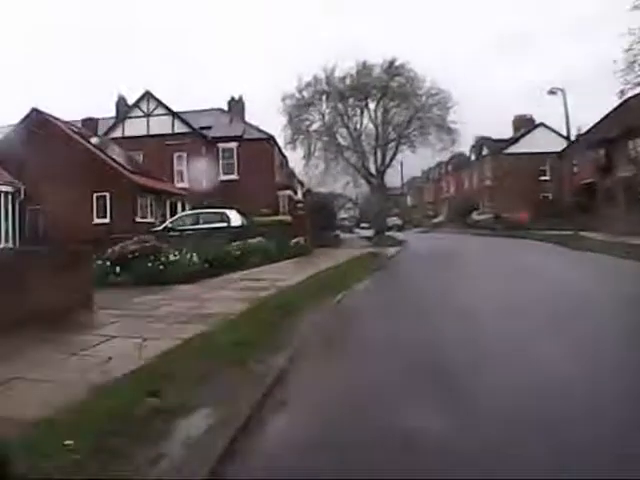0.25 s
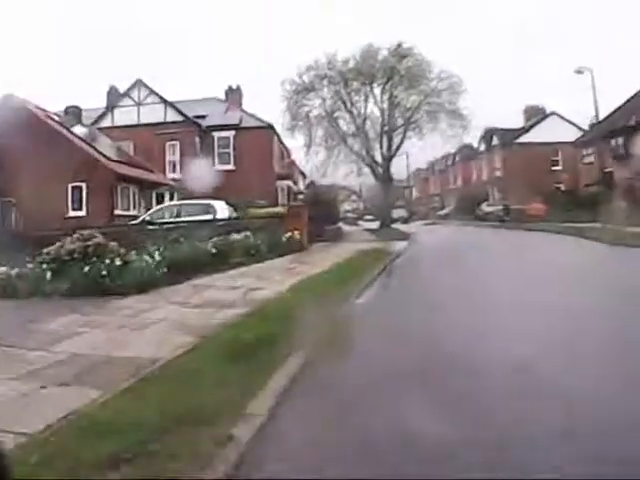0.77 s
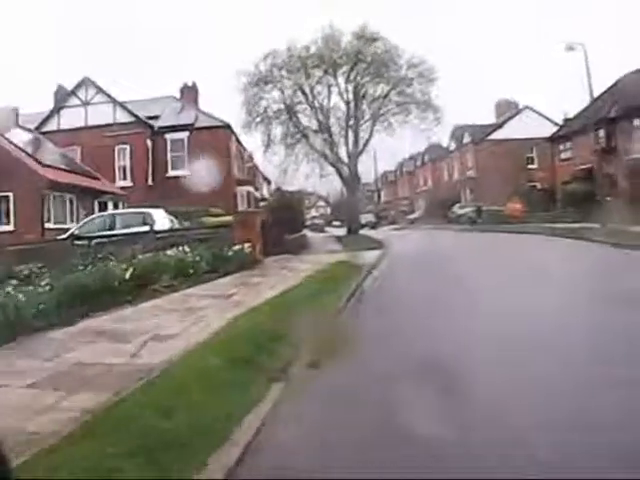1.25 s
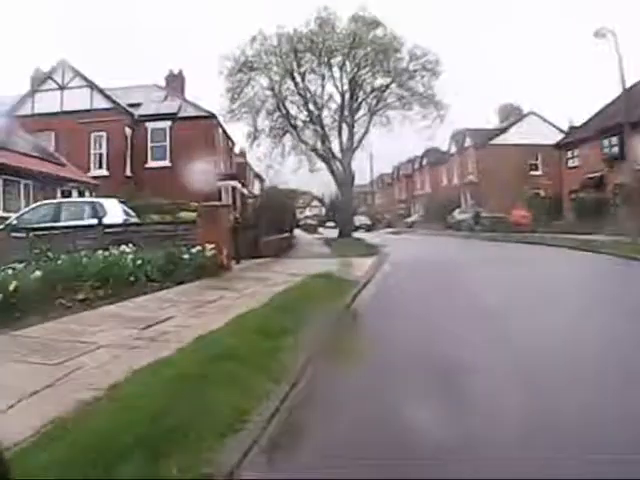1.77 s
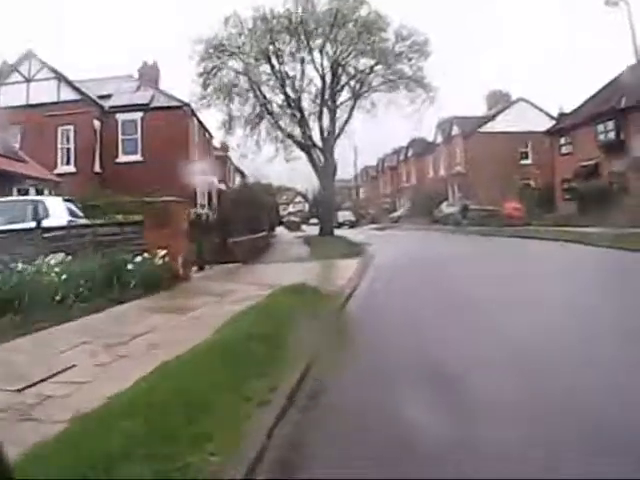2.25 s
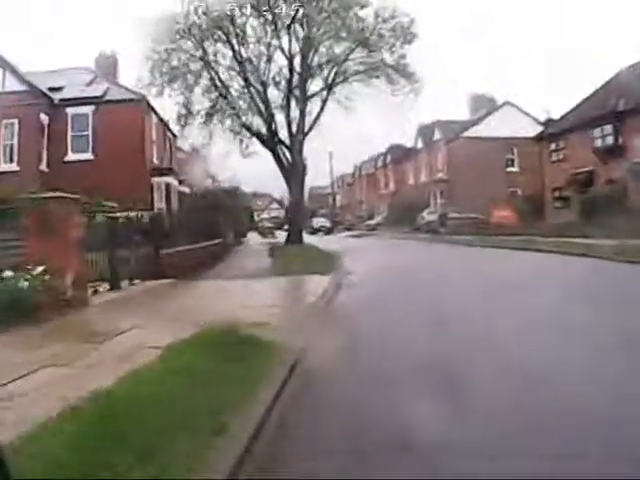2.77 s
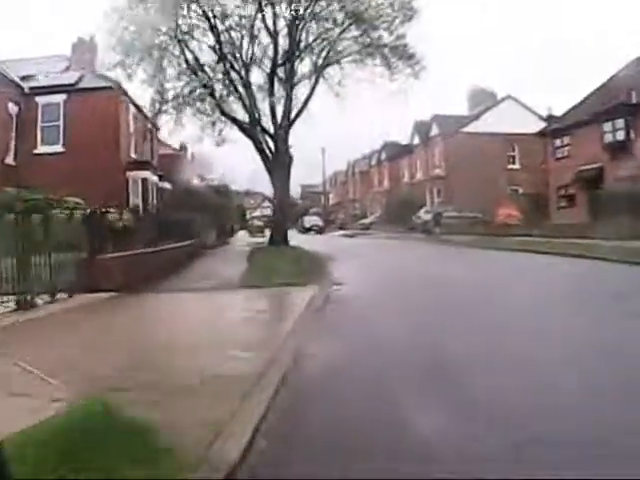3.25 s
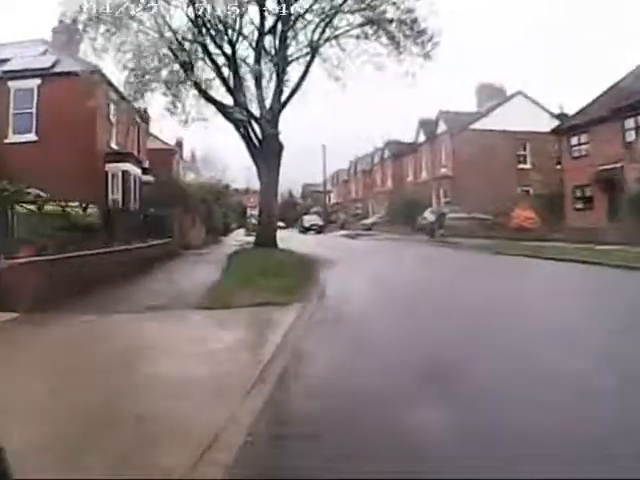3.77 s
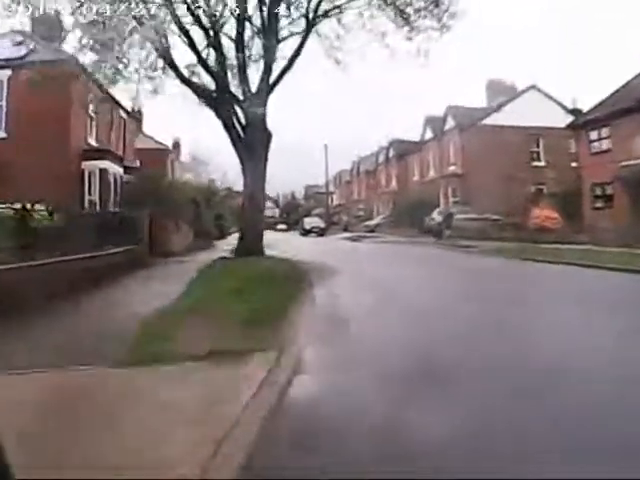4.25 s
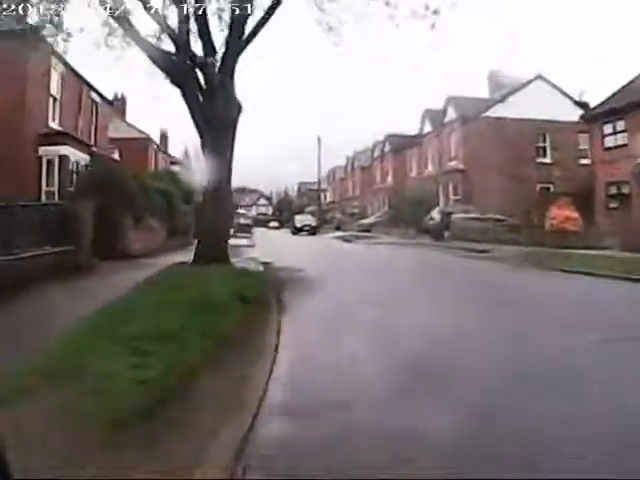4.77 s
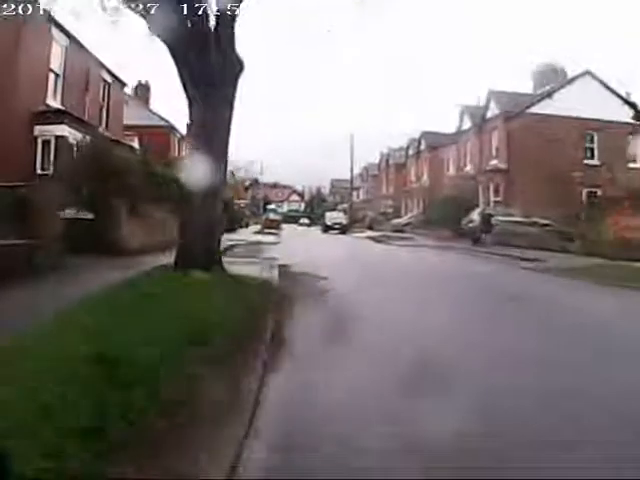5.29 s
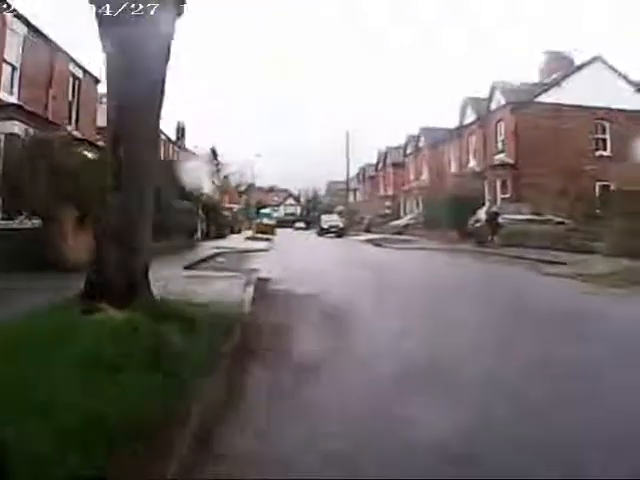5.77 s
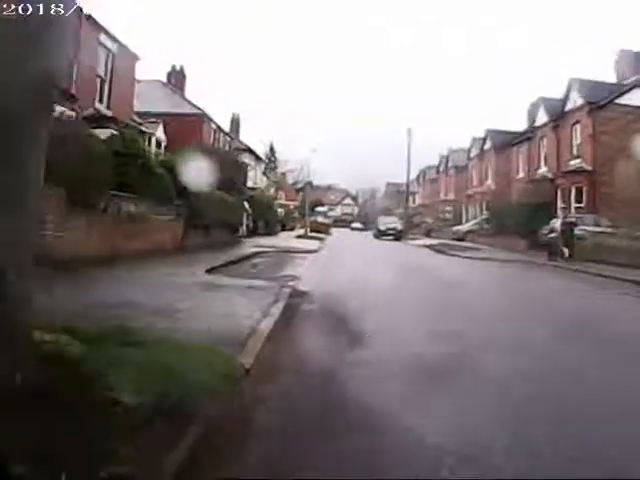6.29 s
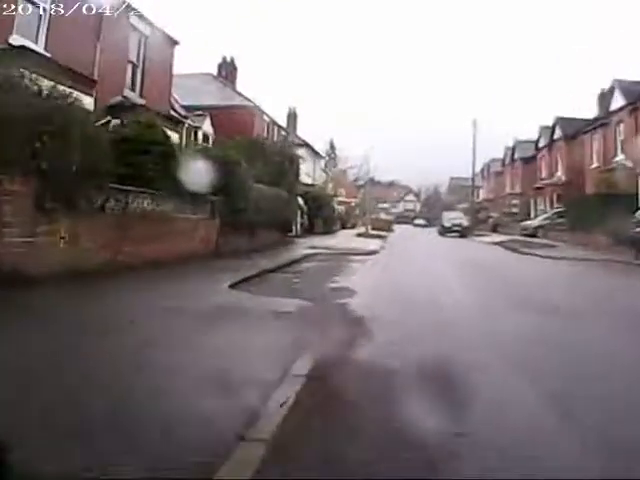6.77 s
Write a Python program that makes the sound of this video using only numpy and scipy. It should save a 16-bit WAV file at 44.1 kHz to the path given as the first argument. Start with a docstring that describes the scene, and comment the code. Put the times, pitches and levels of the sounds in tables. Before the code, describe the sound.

A bicycle rolls along a wet street, its tyres giving a low, uneven rumble and its frame a dull drone, over very faint hiss. A loose camera rattles in the basket, extremely close to the microphone. From 0 to 1 s, knocks and clacks come quickly, with a sharp pair at 0.3 s. Between 1 and 2.1 s they thin to softer, irregular taps over a fine trembling rattle. At 2.2 to 2.4 s a violent cluster of bangs bursts out, clipping and crackling dryly; more hard hits follow at 2.55 to 2.75 s and 2.95 s. It quiets from 3 to 3.8 s, then knocks return, strongest near 4.35 s. Moderate clacks continue around 5.15 and 5.5 s, then a lull. At 6.4 to 6.55 s hits build to one heavy, crackling bang, and small knocks finish near 7 s. Every blow has a dull thud, bright edge, tiny rebounds and short boxy ring.

```python
"""Tyre rumble and the drone of the frame come first, on a bicycle that rolls along a wet street: shaped noise.
A loose camera rattles close by in the basket; its blows, rebounds and nudges are clicks that ring a resonant body.
Each hit has a dull knock of the weight and a bright clack of the hard edges; a fine rattle trembles between.
Dry noise bursts crackle in the microphone, over a faint hiss; peaks beyond full scale clip flat."""
import sys
import numpy as np
from scipy import signal
from scipy.fft import rfft, irfft
from scipy.io import wavfile

SR = 44100
rng = np.random.default_rng(int(sys.argv[2]) if len(sys.argv) > 2 else 0)


def put_to_file(sound):
    """Save the sound as 16-bit audio at rate SR, in the file named by the first command-line argument."""
    columns = np.atleast_2d(sound).T  # one column per channel
    safe = np.clip(columns, -1, 1)
    whole_steps = np.round(safe * 32767)
    wavfile.write(sys.argv[1], SR, whole_steps.astype(np.int16))


N = 310023
TIME = np.arange(N) / SR   # s

# The camera's main hits against the basket.
# Each row: start in seconds, knock level in dB, clack level in dB (both relative).
HITS = [(0.0946, -25.5, -55), (0.1501, -22, -20.5), (0.2587, -28.5, -60), (0.2822, -48, -31),
        (0.3, -14, -15.5), (0.305, -12.5, -19), (0.468, -23.5, -31.5), (0.5455, -21.5, -16),
        (0.5764, -16, -27), (0.5863, -37, -23), (0.616, -24.5, -24), (0.6711, -25, -48), (0.7077, -26, -31),
        (0.775, -28, -42), (0.8208, -17, -26.5), (0.8648, -27, -21), (0.9091, -20.5, -40),
        (0.971, -33, -30), (1.1, -35, -32), (1.1824, -24.5, -37), (1.286, -29.5, -41), (1.3727, -30, -42.5),
        (1.4418, -24.5, -29), (1.5362, -25.5, -21.5), (1.637, -30.5, -24), (1.7716, -29, -36.5),
        (1.7989, -25.5, -35.5), (1.9505, -37.5, -52), (2.138, -26.5, -38), (2.1893, -24, -56),
        (2.2214, -11.5, -14), (2.2538, -6, -16), (2.281, -16, -26), (2.303, -9, -10.5), (2.3259, -8.5, -12),
        (2.3378, -6.5, -20), (2.3617, -17, -17.5), (2.4955, -24.5, -47), (2.548, -17.5, -13.5),
        (2.5857, -14.5, -20.5), (2.6503, -17.5, -18), (2.6762, -9.5, -14), (2.692, -9, -12),
        (2.738, -18, -25.5), (2.7976, -29.5, -37.5), (2.927, -26, -25), (2.9492, -13.5, -19),
        (3.1235, -32.5, -37.5), (3.4112, -27.5, -40), (3.8227, -31.5, -27.5), (3.899, -23.5, -24),
        (4.0969, -22.5, -18.5), (4.2393, -20, -27.5), (4.3099, -16.5, -13.5), (4.346, -9.5, -15),
        (4.5174, -31, -31.5), (4.6328, -28, -24.5), (4.731, -34.5, -44), (4.8154, -24.5, -23),
        (4.9643, -27.5, -23.5), (5.0297, -37.5, -32.5), (5.0862, -31, -44), (5.144, -19, -18.5),
        (5.1664, -17.5, -21), (5.3238, -33, -38), (5.471, -27, -19.5), (5.5035, -19, -28),
        (5.5761, -28.5, -49), (5.8192, -33, -54), (5.922, -41, -35), (5.997, -32.5, -56),
        (6.2903, -28.5, -39), (6.402, -21, -20), (6.4906, -13.5, -16), (6.5466, -5, -11), (6.675, -41, -35),
        (6.9358, -24.5, -27), (6.9836, -26, -51), (7.0205, -22, -25)]
# Coarseness of the road, felt through the frame.
# Each row: time in seconds, rumble level in dB, frame drone level in dB (both relative).
ROAD = [(0.0, -32.5, -31.5), (0.84, -34, -33), (1.15, -36, -31), (1.43, -36, -31.5), (1.61, -39, -35.5),
        (1.86, -36.5, -39), (2.25, -27, -25.5), (2.45, -38, -26.5), (2.9, -36.5, -34), (3.93, -29.5, -33.5),
        (4.27, -36, -30.5), (5.85, -35, -35.5), (6.58, -33.5, -30.5), (7.03, -41, -34)]


def from_db(db):
    """Decibels to amplitude gain."""
    return 10 ** (np.asarray(db) / 20)


def rms_one(x):
    """Scale to rms 1."""
    return x / np.sqrt(np.mean(x ** 2) + 1e-20)


def at_hz(points, hz):
    """Read a table of (Hz, value) rows along a log-frequency axis."""
    known_hz, values = np.transpose(points)
    return np.interp(np.log(hz + 1), np.log(known_hz), values)


def drift(knots_per_s):
    """Chance unevenness of rms 1: straight lines between random knots."""
    knots = rng.standard_normal(N // 100)
    return rms_one(np.interp(TIME * knots_per_s, np.arange(len(knots)), knots))


def body_lift(hz):
    """Resonances of the camera in its basket: each peak or dip adds to or takes from the power around its centre."""
    # Each row: centre in Hz, width in Hz, lift in dB (before peaks overlap and dips are limited).
    body = [(211, 38, 0.5), (340, 22, 6.5), (446, 48, 7.5), (497, 12, 6.5), (765, 37, 4), (940, 9.2, 8),
            (1065, 63, 8), (1194, 11, 5), (1187, 55, 6.5), (1274, 20, 8), (1368, 27, 9), (1500, 57, 1.5),
            (1762, 60, 5.5), (1825, 30, 7.5), (1990, 10, -7), (2382, 95, 9.5), (2828, 50, 13),
            (2845, 48, 5), (3032, 62, 14.5), (3620, 14, -10.5), (3760, 120, 6), (3668, 70, 9),
            (4240, 56, 6.5), (5560, 290, 6), (9020, 93, 4.5), (12300, 160, 4.5), (12500, 120, 11.5),
            (13100, 48, 11), (14620, 340, 14)]
    added_power = 0
    for centre, width, db in body:
        added_power = added_power + (from_db(db) ** 2 - 1) / (1 + (2 * (hz - centre) / width) ** 2)
    return np.sqrt(1 + added_power.clip(-.5))   # no dip is deeper than half the power


def coloured_noise(colour, through_body=False):
    """Steady noise of rms 1, shaped by a spectrum and, if asked, by the body's resonances."""
    hz = np.arange(N // 2 + 1) * SR / N
    gain = from_db(at_hz(colour, hz))
    if through_body:
        gain = gain * body_lift(hz)
    return rms_one(irfft(rfft(rng.standard_normal(N)) * gain, N))


def shaking(jolt_db, follows, settle_s):
    """Gain of the shaking each hit adds: its energy grows with the knock and falls to 1/e in settle_s."""
    s, knock_db, _ = np.transpose(HITS)
    jolts = np.zeros(N)
    # follows: dB of shaking per dB of knock
    jolts[(s * SR).astype(int).clip(0, N - 1)] = from_db(jolt_db + follows * knock_db) ** 2
    decay = np.exp(-1 / (settle_s * SR))
    energy = signal.lfilter([1], [1, -decay], jolts + 1e-18)
    return np.sqrt(energy)


def road_noise():
    """Tyre rumble and the frame's drone are noises that follow the road's coarseness and swell with each hit."""
    # Spectrum of the tyre rumble. Each row: frequency in Hz, relative density in dB per Hz.
    rumble_colour = [(20, -12.5), (33, -17.5), (40, -1.5), (60, 5), (80, -7), (97, 3), (120, -6),
                     (160, -21.5), (400, -73.5)]
    # Spectrum of the frame's drone before the resonances. Each row: frequency in Hz, relative dB per Hz.
    drone_colour = [(80, -3.5), (140, -0.5), (200, 3.5), (290, -2.5), (400, -8.5), (500, -3), (600, -19.5),
                    (900, -16), (2000, -47.5)]
    s, rumble_points, drone_points = np.transpose(ROAD)
    rumble_db = np.interp(TIME, s, rumble_points) + 1 + 1.2 * drift(7)
    drone_db = np.interp(TIME, s, drone_points) + 0.17 + 0.32 * drift(9)
    rumble_gain = np.hypot(from_db(rumble_db), shaking(jolt_db=-16, follows=0.8, settle_s=0.023))
    drone_gain = np.hypot(from_db(drone_db), shaking(jolt_db=-26, follows=0.62, settle_s=0.039))
    rumble = rumble_gain * coloured_noise(rumble_colour)
    drone = drone_gain * coloured_noise(drone_colour, through_body=True)
    return rumble + drone


def faint_hiss():
    """A quiet bed of treble noise whose level wavers slightly."""
    # Spectrum of the hiss. Each row: frequency in Hz, relative density in dB per Hz.
    hiss_colour = [(1000, 14), (4000, 3.5), (6000, 1), (8500, -70.5), (10500, 3.5), (12000, -5),
                   (14300, -1), (16000, -4)]
    return from_db(-64.0 + 1.2 * drift(15)) * coloured_noise(hiss_colour)


def body_ring(colour, early_db, early_s, rise_s, size=16384, count=14):
    """Answer to one contact: crowded modes swell, lose energy quickly at first, then ring out band by band."""
    # Ring time of the body after the early loss. Each row: frequency in Hz, time to fall by 60 dB in seconds.
    ring = [(100, 0.11), (500, 0.34), (1300, 0.19), (1900, 0.29), (2900, 0.21), (3900, 0.12), (8000, 0.25),
            (14000, 0.19)]
    hz = np.arange(size // 2 + 1) * SR / size
    t = TIME[:size]
    random_phase = np.exp(2j * np.pi * rng.random(len(hz)))
    modes = from_db(at_hz(colour, hz)) * body_lift(hz) * random_phase
    centres = np.geomspace(100, 14000, count)   # Hz
    out = 0
    for centre, share in zip(centres, np.eye(count)):
        band = irfft(modes * np.interp(hz, centres, share))   # overlapping triangular bands
        out = out + band * 1000 ** (-t / at_hz(ring, centre))   # a factor of 1000 is 60 dB
    early_boost = 1 + from_db(early_db) * np.exp(-t / early_s)
    swell = 1 - np.exp(-t / rise_s)
    out = out * early_boost * swell
    return out / np.sqrt(np.mean(out[:SR // 50] ** 2))   # rms 1 over the first 20 ms


def struck(trains, colour, early_db, early_s, rise_s):
    """Each contact spot's click train excites the body's modes in a random mix of its own."""
    out = 0
    for train in trains:
        out = out + signal.oaconvolve(train, body_ring(colour, early_db, early_s, rise_s))[:N]
    return out


def fine_rattle(touches_per_s, spread_db, flutter_db, spots=6):
    """The grain of the asphalt keeps the camera trembling: many tiny random touches, stronger after each hit."""
    # Spectrum of the tiny touches before the resonances. Each row: frequency in Hz, relative dB per Hz.
    rattle_colour = [(300, -0.5), (700, 5), (1000, -1), (1400, 1), (1900, -1), (2200, -19.5), (2650, -34),
                     (3000, -23.5), (4500, -25), (8000, -32.5), (14000, -24)]
    touched = rng.random(N) < touches_per_s / SR
    sizes = from_db(spread_db * rng.standard_normal(N).clip(-2, 2))
    touches = touched * rng.choice([-1, 1], N) * sizes
    spot = rng.integers(0, spots, N)
    trains = [touches * (spot == k) for k in range(spots)]
    rings = struck(trains, rattle_colour, early_db=0, early_s=0.0089, rise_s=0.00033)
    trembling = np.hypot(from_db(-42.5), shaking(jolt_db=-24.5, follows=0.38, settle_s=0.041))
    return trembling * rms_one(rings) * from_db(flutter_db * drift(25))


def nudges(count=120):
    """Between blows the camera shifts in soft touches at uneven gaps, stronger where the frame drones louder."""
    nudges_per_s = 9
    knock_db, clack_db, spread_db = -37, -58, 2.5
    road_s, _, drone_db = np.transpose(ROAD)
    s = (np.arange(count) + rng.random(count)) / nudges_per_s
    road_db = np.interp(s, road_s, drone_db - drone_db.mean())
    db = road_db + spread_db * rng.standard_normal(count).clip(-2, 2)
    touches = np.c_[s, knock_db + db, clack_db + db]
    return touches[s < N / SR]


def blows():
    """Every touch as (s, knock dB, clack dB): the hits, one softer fall-back after each, and the nudges."""
    fall_back_s, fall_back_db = .02, -8.5   # the wait varies from half to one and a half times this
    hits = np.array(HITS)
    waits = .5 + rng.random((len(hits), 1))
    fall_backs = hits + [0, fall_back_db, fall_back_db] + waits * [fall_back_s, 0, 0]
    return np.vstack([hits, fall_backs, nudges()])


def contacts(times, levels_db, bounce_s, bounce_db, count=4, size=400, spots=14):
    """A blow is a first touch and weaker rebounds at uneven gaps; one click train for each spot of the basket."""
    out = np.zeros((spots, N + SR))
    chance = rng.random((size, 2, count))
    for k, (s, db, (gaps, signs)) in enumerate(zip(times, levels_db, chance)):
        delays = np.r_[0, np.cumsum(.5 + gaps[1:])] * bounce_s
        sizes = from_db(bounce_db * np.arange(count)) * np.sign(signs - .5)
        sizes = sizes / np.sqrt(np.sum(sizes ** 2))   # the whole blow has energy 1
        out[k % spots, ((s + delays) * SR).astype(int)] += from_db(db) * sizes
    return out[:, :N]


def camera():
    """Blows of the camera's weight and of its hard edges ring the same body."""
    # Spectrum of the dull knock before the resonances. Each row: frequency in Hz, relative dB per Hz.
    knock_colour = [(60, -27), (200, -5.5), (450, -6), (620, -6), (900, -2), (1100, -5), (1350, 0.5),
                    (1520, 3), (1680, -3), (1980, 0.5), (2200, -19), (3000, -22), (4500, -33.5),
                    (14000, -27)]
    # Spectrum of the hard clack before the resonances. Each row: frequency in Hz, relative dB per Hz.
    clack_colour = [(200, -3), (1200, -6.5), (2000, -10), (2650, -8), (2900, 0), (3350, -1), (4250, -3.5),
                    (4700, -13.5), (6300, -15.5), (7600, -19.5), (10000, -15), (14000, -13), (16000, -36)]
    s, knock_db, clack_db = blows().T
    knock_clicks = contacts(s, knock_db, bounce_s=.0026, bounce_db=-3.5)
    clack_clicks = contacts(s, clack_db, bounce_s=.0014, bounce_db=-5.5)
    knocks = struck(knock_clicks, knock_colour, early_db=3.0, early_s=0.068, rise_s=0.00037)
    clacks = struck(clack_clicks, clack_colour, early_db=10, early_s=0.014, rise_s=0.0021)
    return from_db(-0.1) * knocks + from_db(-1.34) * clacks


def microphone_crackle():
    """Dry, sputtering noise bursts made in the microphone itself, so nothing rings after them."""
    # Moments of crackle. Each row: start in seconds, length in seconds, level in dB before the sputter.
    bursts = [(0.307, 0.0012, -13), (2.266, .063, -11.5), (2.3395, .002, -15.5), (2.3633, 0.0022, -7),
              (2.695, .0015, -16), (4.3436, 0.0013, -14), (6.544, 0.0015, -11)]
    # Spectrum of the crackle. Each row: frequency in Hz, relative density in dB per Hz.
    crackle_colour = [(150, -5), (1000, 0), (3500, 5), (6400, -1.5), (7400, -20), (8800, -11), (10500, -4),
                      (15500, -14.5)]
    gate = np.zeros(N)
    for s, length, db in bursts:
        gate += from_db(db) * ((TIME >= s) & (TIME < s + length))
    sputter = from_db(4.5 * drift(250))   # unevenness within a burst
    return gate * sputter * coloured_noise(crackle_colour)


def scene():
    """Road noise through the frame, the faint hiss, and the camera's clatter and crackle on top."""
    rattle = fine_rattle(touches_per_s=160, spread_db=4.0, flutter_db=0.45)
    return (road_noise() + rattle + faint_hiss() + camera() + microphone_crackle())[None]


def record(dry):
    """Peaks beyond full scale clip flat; a steep low-pass then cuts the top."""
    cutoff_hz = 15700
    clipped = np.clip(dry, -1, 1)
    # order 10, ripple 0.1 dB below the cutoff, 70 dB down above it
    low_pass = signal.ellip(10, .1, 70, cutoff_hz, fs=SR, output="sos")
    return signal.sosfilt(low_pass, clipped)


dry = scene()
out = record(dry)
put_to_file(out)
```